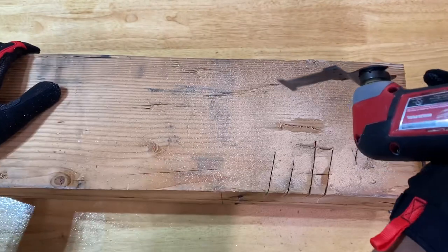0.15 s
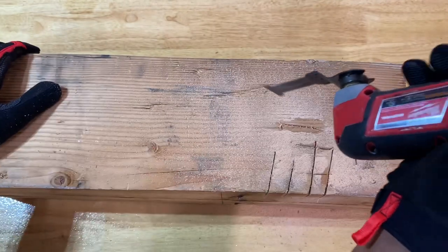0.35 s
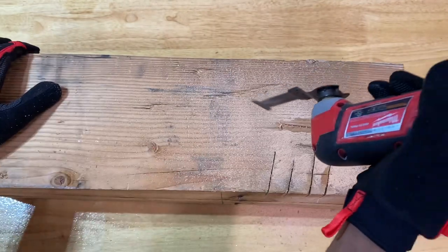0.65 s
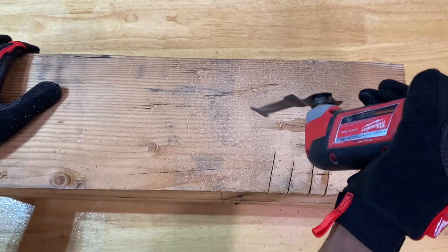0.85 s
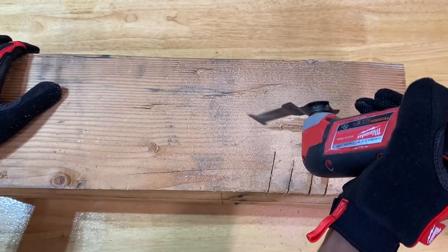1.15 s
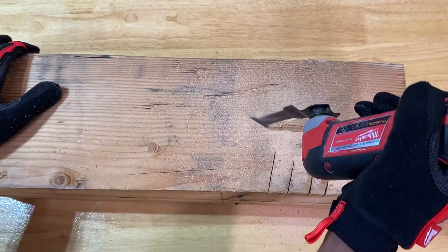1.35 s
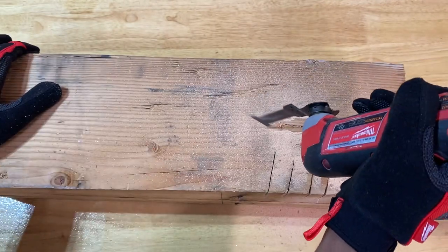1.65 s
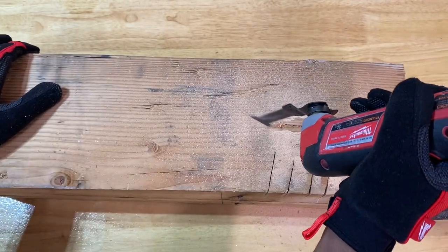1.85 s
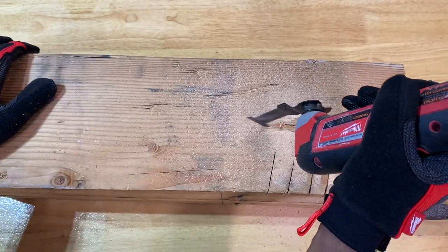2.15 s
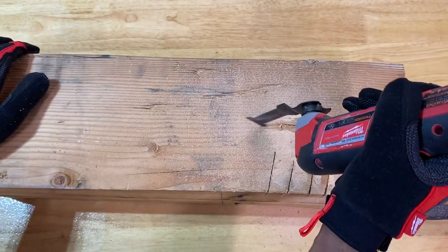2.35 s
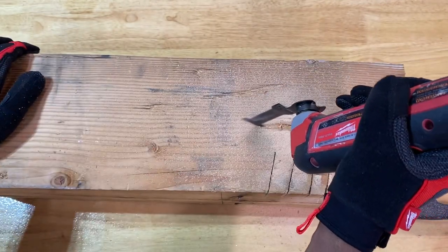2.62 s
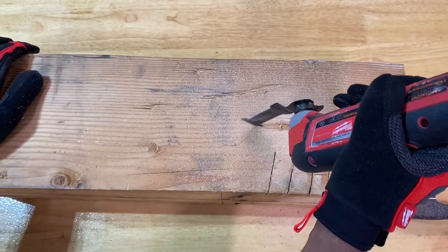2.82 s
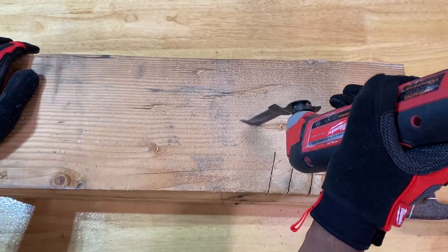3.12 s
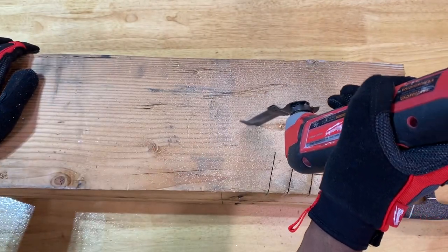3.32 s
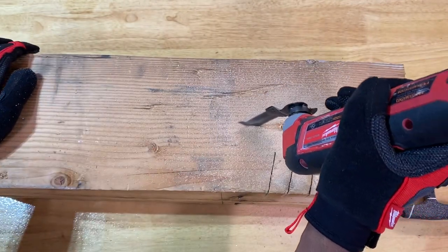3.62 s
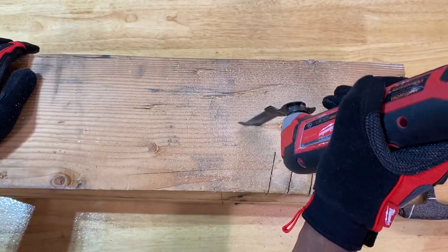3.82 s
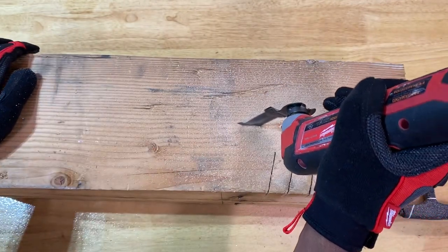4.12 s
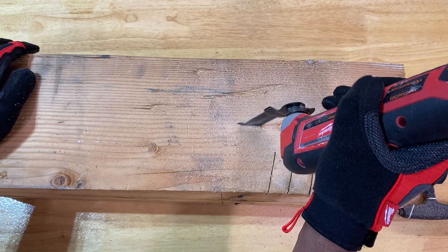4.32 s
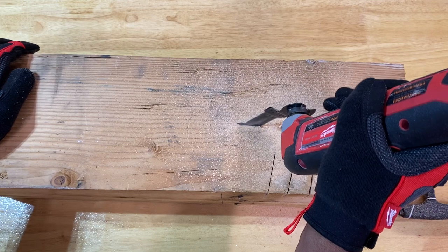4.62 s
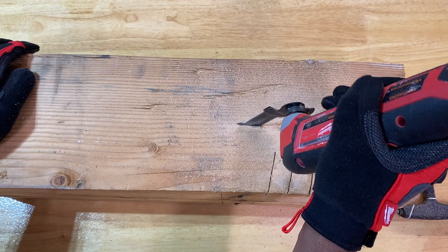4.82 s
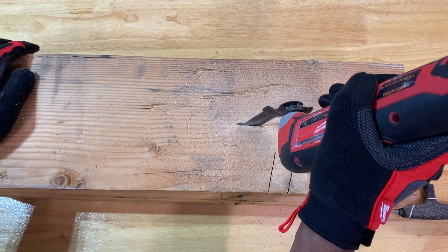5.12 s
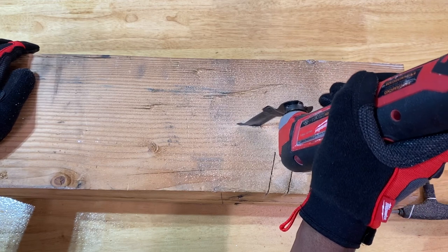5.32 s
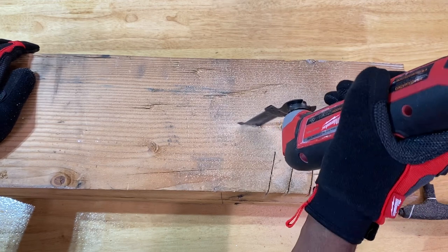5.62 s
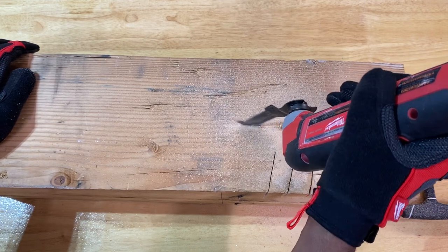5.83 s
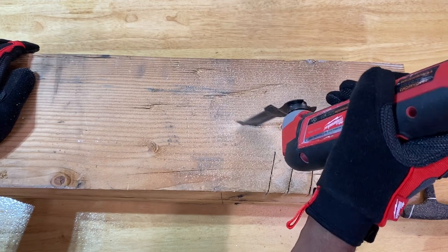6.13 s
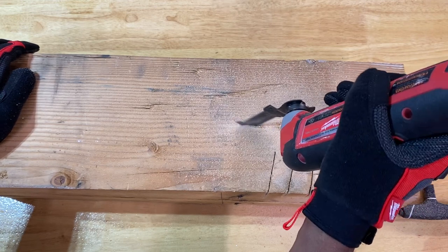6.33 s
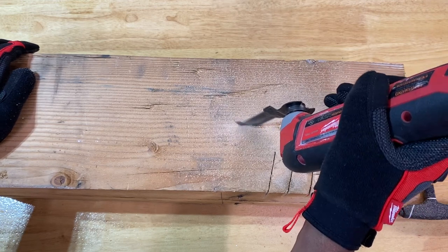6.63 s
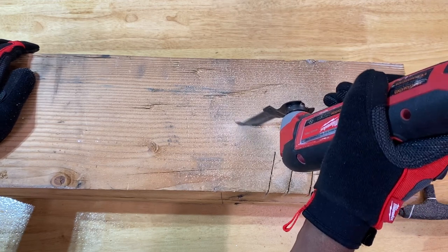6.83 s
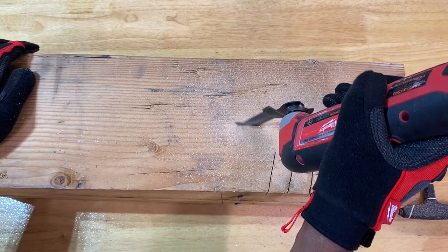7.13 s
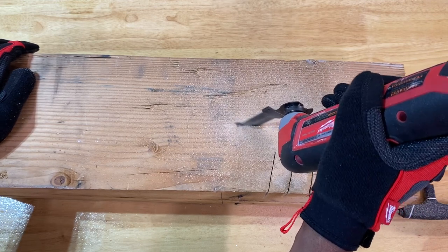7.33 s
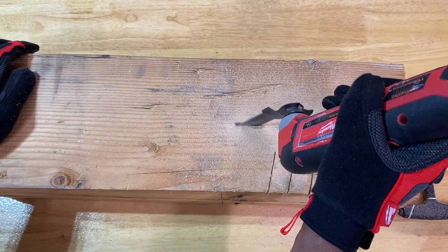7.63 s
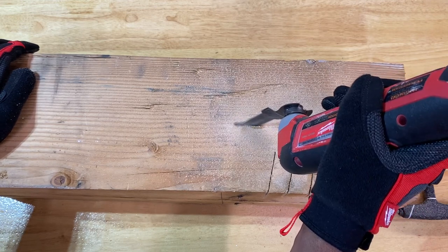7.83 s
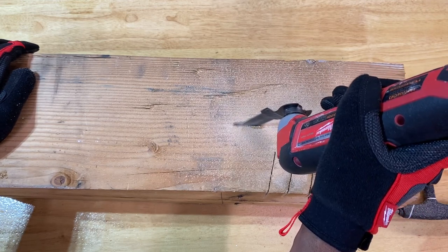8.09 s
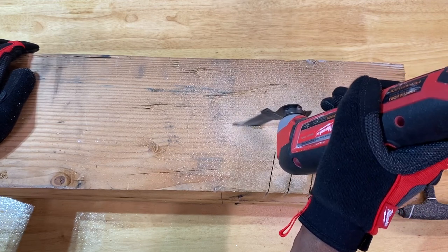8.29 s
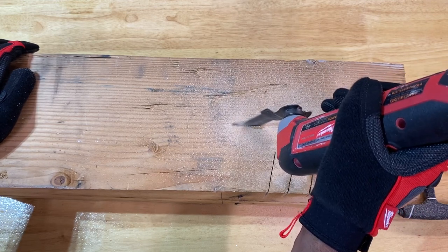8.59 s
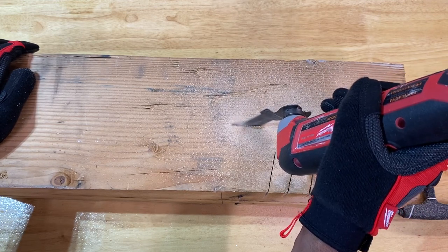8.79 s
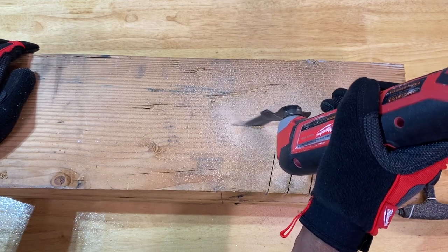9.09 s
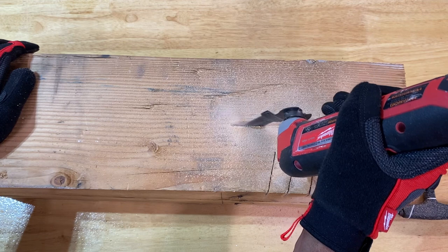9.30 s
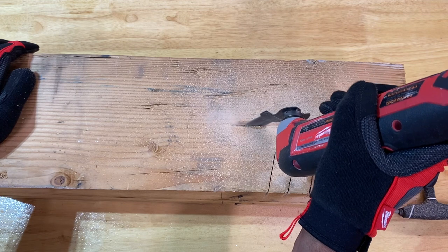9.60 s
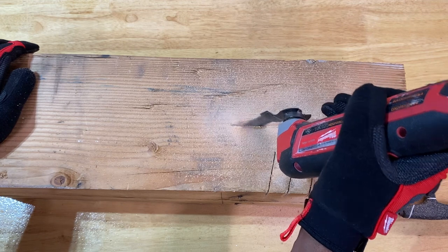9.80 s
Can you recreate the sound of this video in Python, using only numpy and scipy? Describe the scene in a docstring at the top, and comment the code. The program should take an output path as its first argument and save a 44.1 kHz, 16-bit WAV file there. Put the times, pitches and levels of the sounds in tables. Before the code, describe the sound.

A close, dry stereo sound of an oscillating multi-tool at a workbench. From 0 to 1.9 seconds it runs unloaded: a steady, bright, rattling buzz, rising very slightly in pitch. Around 2 seconds the blade bites into a wooden board; the buzz jumps louder and woodier and its pitch drops, sagging lowest near 2.9 with a brief jam and hard, rapid knocks. From 3.3 it chatters, then the motor recovers and climbs gradually through 4 to 5.5, with hissing blade resonance and a gritty buzz. At about 5.6 the blade binds in a short harsh squeal, then is eased off, abruptly quieter and higher until 6. It re-enters near 6.2, dropping in pitch to a ragged rasp, with fluttering, bouncing chatter around 7.2 to 7.7, 8.1 to 8.6 and 9 to 9.4, and a brief singing tone near 8.7. At 9.7 it lifts out, quieter and whirring faster.

```python
"""At a workbench, close by: an oscillating multi-tool rattles in the air, then its blade is pushed into a board.
The load slows the motor. Noise bursts at each reversal make the rattle; a repeating track of teeth, torn-fibre
noise and short knocks make the sawing; both ring through resonances, joined by clean tones and a low hum.
The blade knocks, bounces on every other stroke, binds in a squeal, is eased off, rasps on and lifts out."""
import sys
import numpy as np
from scipy import signal
from scipy.fft import rfft, irfft, next_fast_len
from scipy.io import wavfile
from scipy.ndimage import uniform_filter1d, map_coordinates

SR = 44100
rng = np.random.default_rng(int(sys.argv[2]) if len(sys.argv) > 2 else 0)


def digitize_waveform(pressure):
    """Quantize a signal to 16-bit integers and store it at the path in sys.argv[1].

    Rows of a 2-D input are taken as channels; values are limited to [-1, 1].
    """
    field = np.atleast_2d(pressure).T
    bounded = np.clip(field, -1, 1)
    quanta = np.round(bounded * 32767).astype(np.int16)
    wavfile.write(sys.argv[1], SR, quanta)


N = 438794
TIME = np.arange(N) / SR  # seconds
FREQ = np.maximum(np.arange(N // 2 + 1) * SR / N, 1)  # Hz


def undb(db):
    """Turn decibels into gain."""
    return 10 ** (np.asarray(db) / 20)


def unit(x):
    """Scale to a standard deviation of 1."""
    return x / np.std(x)


def curves(table):
    """Join the rows of a table with straight lines: one value per sample for each column after the time."""
    seconds, *columns = np.transpose(table)
    return [np.interp(TIME, seconds, column) for column in columns]


def walk(rate):
    """Smooth random wander with spread 1, heading for a new value `rate` times a second."""
    return unit(map_coordinates(rng.standard_normal(4096), [TIME * rate], order=3, mode="wrap"))


def spell(start, end, fade):
    """A stretch of time in seconds: rises to 1 around the start, holds, and falls around the end."""
    return np.clip(np.minimum(TIME - start, end - TIME) / fade + .5, 0, 1)


def spells(table, fade):
    """Add up the stretches of time in a table, each at its own strength."""
    return sum(strength * spell(start, end, fade) for start, end, strength in table)


def colour(points, modes=()):
    """Gain at each frequency: a broad slope with resonances on top."""
    hz, db = np.transpose(points)
    slope_db = np.interp(np.log(FREQ), np.log(hz), db)
    peaks_db = sum(peak / (1 + (2 * (FREQ - centre) / width) ** 2) for centre, width, peak in modes)
    return undb(slope_db + peaks_db)


def ring(x, gain):
    """Filter with this gain so that each blow rings after it lands, never before (minimum phase)."""
    cepstrum = irfft(np.log(gain + 1e-6), N)
    cepstrum[1:N // 2] *= 2
    cepstrum[N // 2 + 1:] = 0
    return irfft(rfft(x) * np.exp(rfft(cepstrum)), N)


def band(x, low_hz, high_hz, order=12):
    """Keep only the sound between two frequencies."""
    below = (low_hz / FREQ) ** (2 * order)
    above = (FREQ / high_hz) ** (2 * order)
    return irfft(rfft(x) / np.sqrt((1 + below) * (1 + above)), N)


def shake(x, db):
    """Even out a vibration over about a twentieth of a second, then bring it to the given strength."""
    power = uniform_filter1d(uniform_filter1d(x ** 2, size=2200), size=2200)
    return x * undb(db) / np.sqrt(power + 1e-12)


def hum(turn, hum_db, bounce, rough, in_wood):
    """The head swings at the stroke rate; the board adds its octave; a bouncing blade thumps an octave lower."""
    swing = undb(hum_db + 1.06 * rough * walk(35)) * np.cos(2 * np.pi * turn)
    octave_size = (0.65 + 0.84 * in_wood) * undb(.5 * hum_db - 26.5 + 2.2 * walk(13))
    octave = octave_size * np.cos(4 * np.pi * turn)
    half_turn = np.pi * turn + .5 * walk(30)
    thump_shape = np.cos(half_turn) + .5 * np.cos(3 * half_turn) + 2.75 * np.cos(5 * half_turn)
    thump = bounce * undb(-43.5 + 2.0 * walk(22)) * thump_shape
    rumble_db = -59.5 + 5.4 * rough * in_wood + 6.5 * bounce + 2 * walk(13.0)
    rumble = unit(band(rng.standard_normal(N), 72, 340, order=2)) * undb(rumble_db)
    return np.sqrt(2) * (swing + octave + thump) + rumble


def strokes(turn, decay, back, scatter_db):
    """Contact force: a jolt on the forward stroke and another, scaled by `back`, on the way back."""
    # each half stroke has its own random size
    size = undb(scatter_db * rng.standard_normal(8192)[(2 * turn).astype(int)])
    forward_jolt = np.exp(-(turn % 1) / decay)
    back_jolt = back * np.exp(-((turn + .5) % 1) / decay)
    return size * (forward_jolt + back_jolt)


# Tone colour of the rattling drive. Each row: frequency in Hz, relative level in dB.
RATTLE_COLOUR = [(240, -59), (400, -26), (792, -12.5), (850, -8), (1680, -17), (1830, -10), (2510, -9.5),
                 (3430, -4), (4690, -11), (6600, -12), (12000, -22), (15600, -10.5), (22000, -120)]


def rattling(turn):
    """Unloaded, the drive fork clatters in its play at each reversal: decaying noise bursts that ring."""
    clatter = rng.standard_normal(N) * strokes(turn, decay=0.82, back=1.0, scatter_db=1.0)
    return unit(ring(clatter, colour(RATTLE_COLOUR)))


def whine(turn, orders, gate, db, waver_db, slip):
    """Clean multiples of the stroke rate while the tool stays in one way of running."""
    on = gate > 0
    # slip: how far the angle wanders, in strokes
    angle = 2 * np.pi * (turn + slip * walk(60))[on]
    tone, out = 0, np.zeros(N)
    for multiple, line_db in orders:
        waver = np.interp(TIME[on] * 16, np.arange(400), rng.standard_normal(400))
        line_size = undb(line_db + waver_db * waver)
        tone = tone + line_size * np.cos(multiple * angle + 2 * np.pi * rng.random())
    out[on] = unit(tone) * undb(db)
    return out * gate


# Steady tones from free air until the blade has dug in and begun to ring.
# Each row: multiple of the stroke rate, level in dB relative to the other rows of the table.
FREE_TONES = [(3, 1), (4, -7.5), (5, -12), (6, -11), (7, -9), (8, -7), (9, -5), (10, -7), (11, -1.5),
              (12, 1.5), (13, 2.5)]
BITING_TONES = [(3, 8), (4, -1), (5, 5.5), (6, 5.5), (7, -4.5), (8, -10), (9, 1.5), (10, 0.5), (11, -3.5),
                (12, -13), (13, -4), (14, -3.5), (15, -3.5), (16, -8), (17, -11), (18, -8)]
JAMMING_TONES = [(3, -8.5), (4, -3), (5, -10.5), (6, -25), (8, -18), (9, -18), (11, -18), (16, -18)]
RINGING_TONES = [(15, 0), (20, -4), (22, -9), (26, -7)]


def entry_tones(turn):
    """The tool's steady vibration in free air, then biting and digging in, jamming briefly, and ringing."""
    biting = spell(1.97, 2.47, fade=.12)
    digging = spell(2.5, 3.3, fade=.1)
    out = whine(turn, FREE_TONES, spell(-.2, 1.93, fade=.08), db=-4.0, waver_db=3.5, slip=0.0079)
    out += whine(turn, BITING_TONES, biting + .25 * digging, db=0, waver_db=2, slip=0.007)
    out += whine(turn, JAMMING_TONES, spell(2.745, 2.9, fade=.025), db=2, waver_db=1.5, slip=0.008)
    return out + whine(turn, RINGING_TONES, spell(3.85, 4.5, fade=.15), db=-10, waver_db=2, slip=.003)


# Steady tones as the blade rides on the kerf's bottom, squeals, binds, and goes back in.
# Each row: multiple of the stroke rate, level in dB relative to the other rows of the table.
RIDING_TONES = [(3, -8), (3.5, -5.5), (4, -4), (4.5, 3), (5, -5.5), (5.5, -3), (6, -12), (6.5, -21),
                (7, -19), (8, -23), (8.5, -17), (9, -17), (12, -11.5), (14, -24)]
SQUEALING_TONES = [(14, -7), (19, 1), (21, -1)]
BINDING_TONES = [(3, 23), (4, 24), (5, 14), (6, 12), (7, 8), (8, 6), (9, 8.5), (10, 3), (11, 5), (12, 5),
                 (13, 1), (14, 8), (15, 5), (16, -7), (18, -7), (19, 11.5), (20, -5), (21, 3), (22, -7),
                 (23, -9), (24, -14), (25, -4.5), (26, -4), (27, -6), (28, -13), (29, -14), (30, -3),
                 (31, -10)]
ENTERING_TONES = [(3, -1.5), (4, -8), (5, -1), (6, -10)]


def binding_tones(turn, binding):
    """Riding on the kerf's bottom, the blade's own ring just before it binds, the bind, and the re-entry."""
    # the blade settles gradually into riding
    settled = np.clip((TIME - 4.3) / 0.2, 0, 1)
    out = settled * whine(turn, RIDING_TONES, spell(4.3, 5.59, fade=.04), db=-1, waver_db=1, slip=.012)
    out += whine(turn, SQUEALING_TONES, spell(5.52, 5.61, fade=.04), db=3, waver_db=2, slip=.003)
    out += whine(turn, BINDING_TONES, binding, db=11, waver_db=3.2, slip=.004)
    return out + whine(turn, ENTERING_TONES, spell(6.03, 6.3, fade=.06), db=-3, waver_db=1.5, slip=.005)


# Steady tones of the last cut: rasping, chattering, singing, and easing out.
# Each row: multiple of the stroke rate, level in dB relative to the other rows of the table.
RASPING_TONES = [(3, 5.5), (4, 6.5), (5, 3.5), (10, -2.5)]
CHATTERING_TONES = [(2.5, -7), (3, -5), (3.5, 2.5), (4, 3), (4.5, 4.5), (5, -10), (5.5, 3.5)]
SINGING_TONES = [(3, 6.5), (4, 1), (5, -7), (6, -3), (7, -13), (9, -12), (10, -7), (14, -4), (19, -4),
                 (21, -10)]
EASING_TONES = [(3, 6), (4, -15), (5, 2), (6, -5), (7, -7), (8, -5), (9, -6), (10, -3), (11, -3)]


def rasping_tones(turn, rough, bounce):
    """The teeth catch and let go: a seated blade gives whole multiples, a bouncing one adds the halves."""
    rasp = spell(6.3, 9.64, fade=.1)
    grip = undb(4.5 * rough * walk(50))
    seated = grip * rough ** 2 * (1 - .5 * bounce) * rasp
    out = whine(turn, RASPING_TONES, seated, db=-4, waver_db=2, slip=0.014)
    out += whine(turn, CHATTERING_TONES, grip * bounce * rasp, db=-5, waver_db=2.5, slip=0.016)
    # the singing tone grows out of the rasp
    grown = np.clip((TIME - 8.62) / .17, 0, 1)
    out += grown * whine(turn, SINGING_TONES, spell(8.62, 8.92, fade=.04), db=-1, waver_db=2, slip=0.007)
    # the blade lifts out of the cut
    return out + whine(turn, EASING_TONES, spell(9.67, 9.79, fade=.06), db=-8, waver_db=3.5, slip=0.014)


# How raggedly the teeth tear, before bouncing adds to it.
# Each row: time in seconds, roughness from 0 to 1.
TEARING_ROUGHNESS = [(1.9, 0.9), (2.1, 0.5), (2.74, 0.59), (2.84, 0.36), (2.95, 0.61), (3.7, 0.59),
                     (4.2, 0.52), (5.5, 0.49), (5.62, 0.38), (5.82, 0.75), (6.5, .85), (7.1, 0.74),
                     (7.6, 0.62), (8.85, 0.65), (9.55, 0.84), (9.7, 0.59), (9.85, 0.8)]
# When the blade bounces on every other stroke.
# Each row: start in seconds, end in seconds, strength from 0 to 1, on top of a slight bounce in any cut.
BOUNCE_SPELLS = [(2.42, 2.76, 0.22), (3.3, 3.48, 0.58), (3.66, 3.78, 0.5), (6.65, 7.1, 0.16),
                 (7.2, 7.7, 0.75), (8.1, 8.65, 0.73), (8.93, 9.42, 0.61)]
# When the blade knocks on the end of the kerf.
# Each row: start in seconds, end in seconds, relative strength.
KNOCK_SPELLS = [(2.88, 3.36, 0.62), (4.25, 4.9, 0.16), (8.95, 9.68, 0.13)]


def contact(in_wood):
    """How the teeth meet the wood: a bouncing blade also tears more raggedly."""
    least_bounce = 0.029 * in_wood
    bounce = np.clip(least_bounce + spells(BOUNCE_SPELLS, fade=0.081), 0, 1)
    rough = np.clip(curves(TEARING_ROUGHNESS)[0] + 0.1658 * bounce, 0, 1)
    knock = spells(KNOCK_SPELLS, fade=0.15)
    return rough, bounce, knock


def teeth(turn, wear_rate, count=160):
    """The teeth cross the same fibres on every stroke; the track changes as it wears."""
    # each row is one random track around a stroke; wear_rate rows go by each second
    tracks = irfft(np.exp(2j * np.pi * rng.random((400, count // 2 + 1))), axis=1)
    place = [TIME * wear_rate, turn % 1 * count]
    return unit(map_coordinates(tracks, place, order=3, mode="grid-wrap"))


# Broad tone colour of blade and board in the cut. Each row: frequency in Hz, relative level in dB.
KERF_COLOUR = [(240, -24), (400, -50), (455, -16), (604, -6.5), (677, -2), (913, 2.5), (1680, -1),
               (2470, -3.5), (2980, -4.5), (3950, -0.5), (4760, -2.5), (5410, 2.5), (12000, -4.5),
               (15600, -9.5), (22000, -120)]
# Resonances on top of that colour. Each row: frequency in Hz, width in Hz, boost (or cut) in dB.
BLADE_RESONANCES = [(1170, 820, 6), (2545, 380, 4), (3996, 28, 6.5), (4810, 190, -6.5), (5230, 520, 4.5),
                    (6106, 113, 7.5), (7270, 640, 4)]


def sawing(turn, hz, rough, bounce, knock):
    """A repeating scrape, freshly torn fibres and hard knocks on the kerf's end ring blade and board."""
    # in a rough cut the teeth slip from stroke to stroke, which blurs the highest harmonics
    track = teeth(turn + .011 * rough * walk(140), wear_rate=6)
    # a rocking blade takes a different track on every other stroke
    rocking = np.clip(0.34 * (spell(3.75, 5.57, fade=.1) + bounce), 0, 1)
    other_track = np.cos(np.pi * turn) * teeth(turn, wear_rate=5)
    track = np.sqrt(1 - rocking) * track + np.sqrt(2 * rocking) * other_track
    scrape = np.sqrt(1 - rough ** 2) * track + rough * rng.standard_normal(N)
    scrape = unit(scrape * strokes(turn, decay=0.88, back=0.62, scatter_db=2.0 * rough))
    # each knock is a short pulse, centred on one moment of the stroke
    samples_off = ((turn + .5) % 1 - .5) * SR / hz + 2 * rough * walk(200)
    pulse = np.sinc(.5 * samples_off) * np.exp(-(samples_off / 8) ** 2)
    knocks = unit(pulse * undb(2 * walk(150)))
    every_other = 1 + 0.14 * bounce * np.cos(np.pi * turn)
    force = (scrape + 0.67 * knock * knocks) * every_other
    return unit(ring(force, colour(KERF_COLOUR, BLADE_RESONANCES)))


# Resonances that swell or dip for a while, each around its own moment.
# Each row: middle in seconds, duration in seconds, frequency in Hz, width in Hz, boost (or cut) in dB.
FLARE_SWELLS = [(.1, 1.2, 2830, 220, 6.5), (0.746, 0.45, 3080, 300, 5), (1.398, 1, 3410, 400, 2.5),
                (2.021, 0.16, 3470, 280, 11.5), (2.42, 0.31, 4306, 300, 7.5), (2.755, 0.1, 1650, 700, 1.5),
                (2.967, 0.19, 2000, 520, 6.5), (3.128, 0.6, 5480, 300, 10), (3.431, 0.12, 2395, 220, 7.5),
                (3.599, 0.48, 2310, 400, 2.5), (3.985, 0.1, 2500, 400, 8), (4.058, 1.06, 5735, 723.6, 10),
                (4.638, 0.98, 7260, 700.4, 7.5), (5.0, 0.51, 8520, 901, 8.5), (5.66, 0.052, 2895, 300, -9),
                (5.73, 0.091, 2200, 300, 6), (5.68, .05, 2560, 200, 7), (5.74, .07, 1760, 500, -11),
                (5.743, .07, 3590, 600, 5), (5.745, .07, 5370, 300, -5), (5.96, .08, 3660, 249.5, 7),
                (6.129, 0.19, 1512, 160.4, 4), (8.227, 0.063, 1143, 400, 6), (9.2, 1.16, 5603, 402, 6),
                (9.268, .16, 1251, 319.3, 5), (9.5, .3, 3950, 351, 4), (9.881, .02, 740, 500, 13)]


def flare(x, bounce):
    """Each resonance swells or dips around its own moment; bouncing changes the board's own."""
    size = next_fast_len(N, True)
    spectrum = rfft(x, size)
    freq = np.arange(size // 2 + 1) * SR / size
    # the board resonance at 1210 Hz dips while the blade bounces
    swells = [(1210, 530, -1.5 * bounce)]
    for middle, duration, hz, width, db in FLARE_SWELLS:
        swell = np.exp(-np.square((2 * (TIME - middle) / duration) ** 2))
        swells.append((hz, width, db * swell))
    out = x
    for hz, width, db in swells:
        peak = 1 / (1 + np.square((2 * (freq - hz) / width) ** 2))
        out = out + (undb(db) - 1) * irfft(spectrum * peak, size)[:N]
    return out


# How hard each part is shaken, before hand pressure and bursts vary it.
# Each row: time in seconds, board level in dB, housing level in dB, blade level in dB.
SHAKING = [(0.0, -21.5, -22.5, -25.5), (1.83, -23, -24, -27.5), (1.91, -21.5, -22, -25),
           (1.99, -16.5, -16, -19), (2.12, -19, -19, -21.5), (2.3, -17, -15.5, -19.5),
           (2.55, -21.5, -21, -24.5), (2.69, -23, -18, -19.5), (2.715, -15, -20, -21),
           (2.76, -15, -19.5, -20.5), (2.86, -18, -20, -23.5), (2.95, -19.5, -19.5, -19.5),
           (3.23, -22, -19.5, -16), (3.34, -21.5, -22, -23), (3.44, -22, -17, -21), (3.56, -22.5, -22, -22),
           (3.77, -23, -22.5, -19), (3.92, -26, -23, -18.5), (3.985, -25, -20.5, -18),
           (4.05, -25.5, -23, -18), (4.3, -24, -25, -19), (5.1, -23.5, -28.5, -28),
           (5.49, -23.5, -27.5, -28.5), (5.56, -20.5, -25.5, -18.5), (5.67, -22.5, -22, -16),
           (5.745, -24.5, -24, -19), (5.773, -20, -22, -26), (5.795, -35, -32, -35),
           (5.89, -34.5, -34, -35.5), (5.945, -29.5, -27.5, -25), (6.02, -29, -30, -29),
           (6.07, -26, -28, -27), (6.65, -24, -25.5, -21.5), (7.54, -25.5, -24.5, -22),
           (7.76, -28, -25.5, -23), (8.05, -27, -26, -23), (8.22, -24.5, -25, -24),
           (8.85, -25.5, -24.5, -20), (9.02, -24.5, -24.5, -22.5), (9.3, -23.5, -21.5, -19),
           (9.62, -24.5, -23.5, -20.5), (9.75, -29, -26.5, -22.5), (9.81, -32.5, -33, -36),
           (9.95, -35, -32, -35)]


def tool_body(drive, turn, rough, bounce, in_wood, press):
    """Board, housing and blade each ring in their own band, low to high, and shake harder with pressure."""
    board_db, housing_db, blade_db = curves(SHAKING)
    # a bouncing blade hits harder on every other stroke, and loses and regains its step
    flutter = 1 + 0.13 * bounce * np.cos(np.pi * turn + 2.3 * walk(22))
    chatter = flutter * undb(0.62 * in_wood * rough * walk(45))
    # a ragged cut drums on the board in bursts
    stutter_db = 2 * in_wood * rough ** 2 * walk(26)
    board = shake(band(drive * chatter, 488, 2004), board_db + stutter_db)
    housing = shake(band(drive, 2075, 4330), housing_db)
    blade = shake(band(drive, 4870, 11200), blade_db)
    return (board + housing + blade) * undb(0.72 * press)


# Sides against middle by frequency; near 12 kHz the sides far outweigh the middle. # Each row: frequency in Hz,
# level of the sides compared with the middle in dB.
STEREO_WIDTH = [(100, -24.5), (360, -18.5), (650, -7), (1170, -19), (2130, -8), (3860, -2.5), (5600, -6.5),
                (8000, -4), (12000, 15)]


def stereo(mid, smear_share, smear_s):
    """A phase-shifted side signal; a short random smear, growing with frequency, makes the sides less alike."""
    smear = rfft(rng.standard_normal(N) * np.exp(-TIME / smear_s))
    smear = smear / np.sqrt(np.mean(abs(smear) ** 2))
    share = np.clip(smear_share * FREQ / (FREQ + 600), 0, 1)
    spread = 1j * np.sqrt(1 - share) + np.sqrt(share) * smear
    side = irfft(rfft(mid) * colour(STEREO_WIDTH) * spread, N)
    return np.array([mid + side, mid - side])


# Motor speed, sagging under load, before hand pressure and snags vary it.
# Each row: time in seconds, strokes per second in Hz.
MOTOR_SPEED = [(0.0, 259), (0.97, 267.5), (1.88, 269.4), (2.08, 244.6), (2.48, 238.3), (2.94, 221.9),
               (3.82, 262.1), (4.03, 265.4), (4.2, 273.2), (5.27, 286.5), (5.5, 283.3), (5.685, 285),
               (5.73, 279), (5.77, 279), (5.87, 310.7), (6.2, 295.8), (6.33, 268), (6.77, 264.1),
               (7.16, 272.5), (7.31, 270.3), (7.83, 285.1), (8.05, 281.5), (8.48, 268.9), (8.72, 282.3),
               (8.86, 284), (9.01, 269.2), (9.3, 265.8), (9.52, 273.2), (9.635, 265.8), (9.71, 301),
               (9.77, 308.7), (9.95, 322)]
# Hum of the swinging head, before hand pressure and roughness vary it.
# Each row: time in seconds, level in dB.
HUM_LEVEL = [(0.0, -35.5), (1.91, -31.5), (2.08, -23), (2.42, -25.5), (2.6, -29.5), (2.88, -26.5),
             (3.05, -31), (3.3, -33), (3.58, -23.5), (4.18, -27), (5.46, -31), (5.75, -34), (5.8, -40),
             (6.15, -48), (6.29, -38.5), (6.51, -34), (7.57, -39), (9.56, -31.5), (9.81, -45.5),
             (9.95, -41)]


def scene():
    """One shaft angle times every layer; uneven hand pressure slows the motor and shakes everything harder."""
    hz, hum_db = curves(MOTOR_SPEED)[0], curves(HUM_LEVEL)[0]
    in_wood = np.clip((TIME - 1.89) / .08, 0, 1)
    rough, bounce, knock = contact(in_wood)
    press = in_wood * rough * walk(9)
    hz = hz * (1 - .004 * press)
    hum_db = hum_db + 1.0 * press
    # torn fibres snag the blade, so the speed trembles
    tremble = 1 + .013 * in_wood * rough ** 4 * walk(35)
    turn = np.cumsum(hz * tremble) / SR  # strokes so far
    drive = (1 - in_wood) * rattling(turn) + in_wood * sawing(turn, hz, rough, bounce, knock)
    # while the teeth are held fast, part of the scraping stops
    binding = spell(5.58, 5.755, fade=.06)
    drive = drive * (1 - .45 * binding)
    tones = entry_tones(turn) + binding_tones(turn, binding) + rasping_tones(turn, rough, bounce)
    drive = flare(drive + tones, bounce)
    body = tool_body(drive, turn, rough, bounce, in_wood, press)
    return stereo(body + hum(turn, hum_db, bounce, rough, in_wood), smear_share=0.9, smear_s=0.017)


def record(dry):
    """Round off the highest peaks smoothly, then cut the treble steeply above 12.7 kHz."""
    rounded = dry / (1 + (dry / .9) ** 8) ** (1 / 8)
    treble_cut = signal.ellip(8, .2, 80, 12700, fs=SR, output="sos")
    return signal.sosfilt(treble_cut, rounded)


dry = scene()
out = record(dry)
digitize_waveform(out)
```